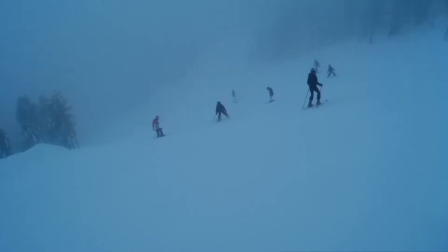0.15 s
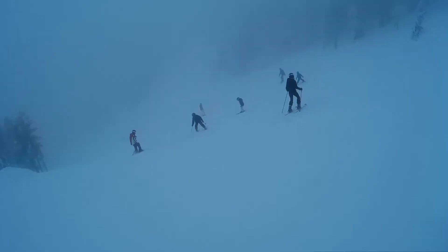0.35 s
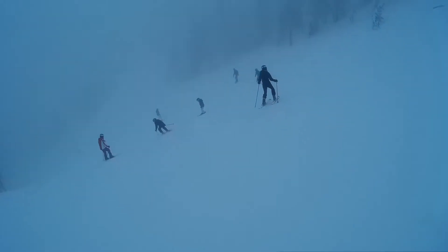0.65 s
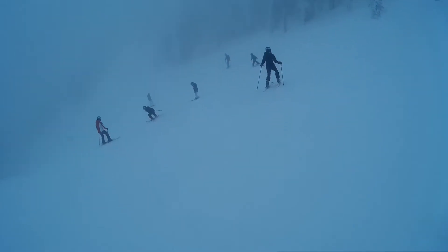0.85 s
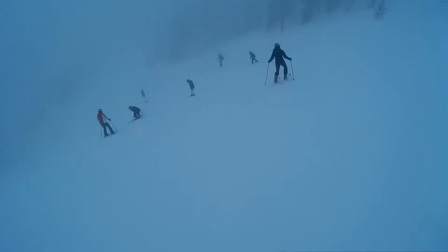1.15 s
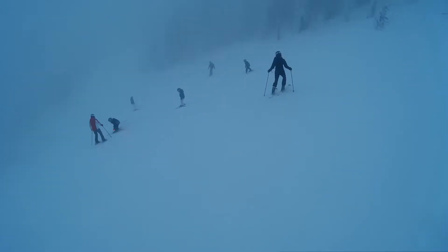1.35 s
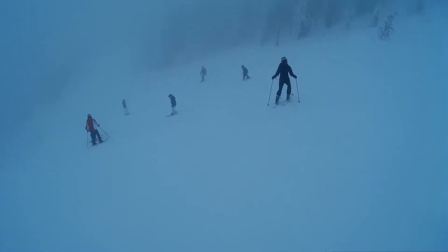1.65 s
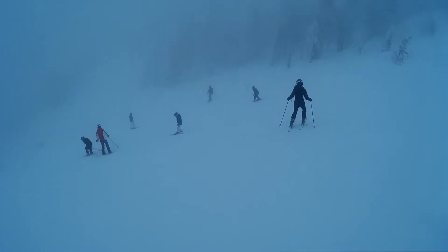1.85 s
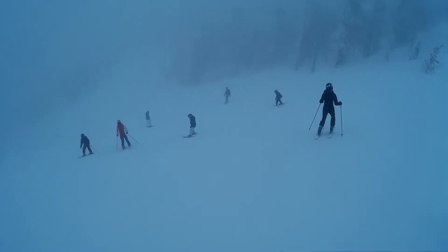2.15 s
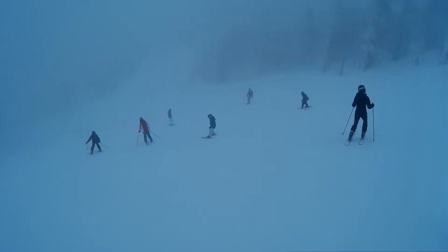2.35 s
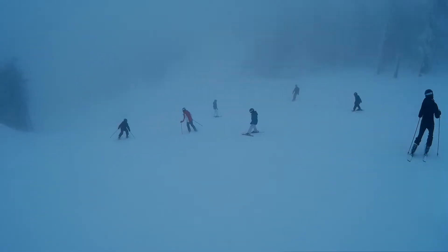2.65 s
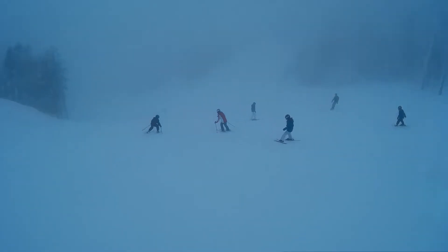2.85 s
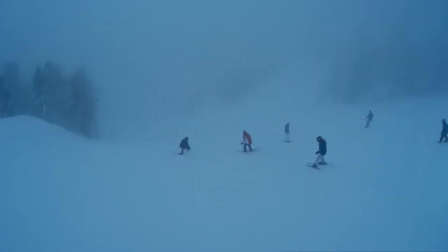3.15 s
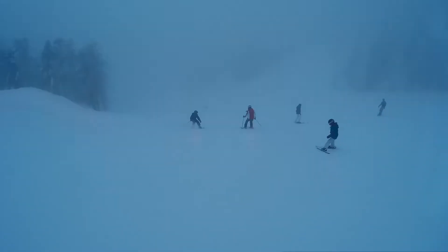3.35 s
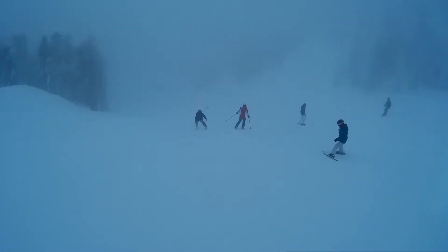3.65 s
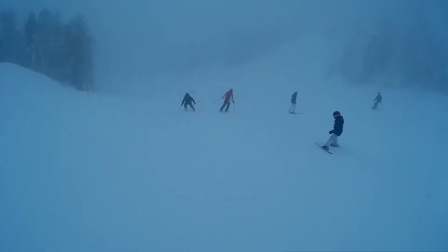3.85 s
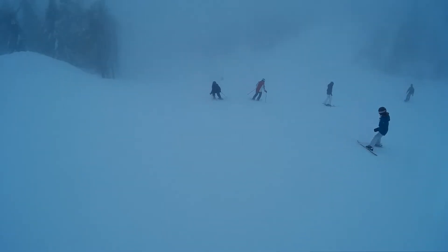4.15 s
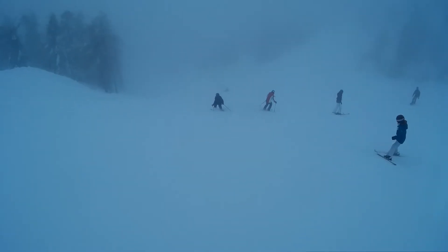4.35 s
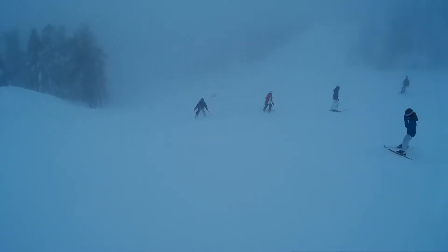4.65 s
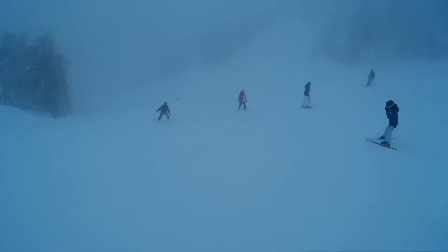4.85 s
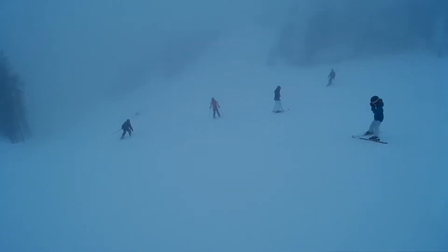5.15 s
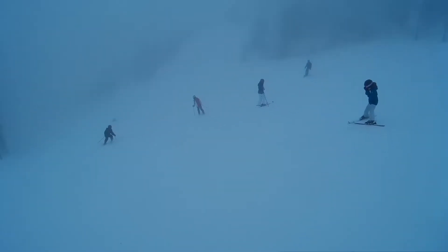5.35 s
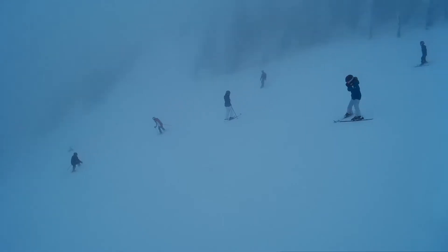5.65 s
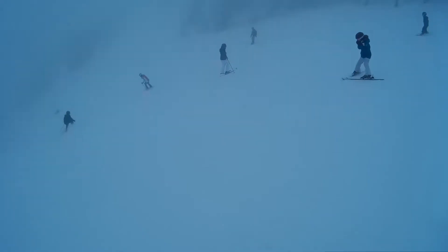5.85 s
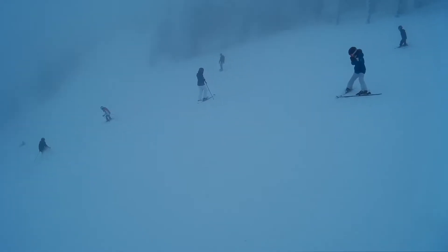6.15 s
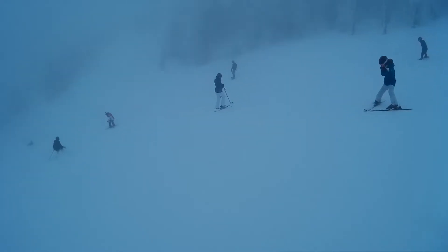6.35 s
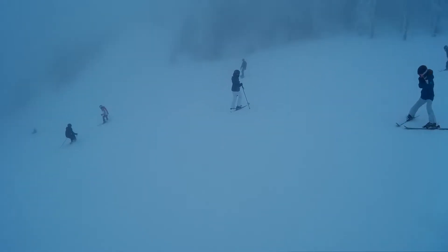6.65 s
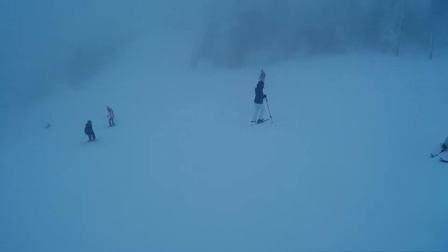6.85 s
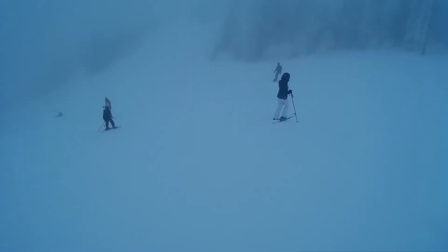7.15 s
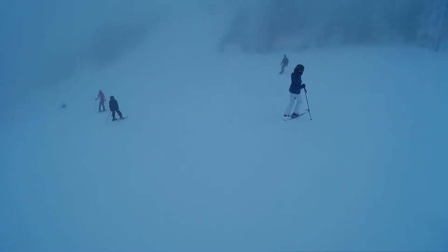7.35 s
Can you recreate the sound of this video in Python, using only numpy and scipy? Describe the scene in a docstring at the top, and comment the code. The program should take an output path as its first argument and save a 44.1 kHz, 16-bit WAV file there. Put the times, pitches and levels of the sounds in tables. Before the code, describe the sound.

Sharp knocks and dull handling thumps on a microphone, over quiet skis gliding and skidding on snow with low wind.

```python
"""Skis glide and scrape over packed snow, heard from a camera carried by the skier.
Crushed snow hisses through the resonances of the camera case, swelling each time the edges skid.
Ruts shake the skis into a rumble. The case is knocked and bumped in the hand; clothing ticks
against it and once brushes hard across it. Underneath, air buffets the microphone port."""
import sys
import numpy as np
from scipy import signal
from scipy.fft import rfft, irfft
from scipy.io import wavfile
from scipy.ndimage import uniform_filter1d

SR = 44100
rng = np.random.default_rng(int(sys.argv[2]) if len(sys.argv) > 2 else 0)


def dump_mix(stems):
    """Bounce the given channels to the path in sys.argv[1] as a 16-bit WAV at rate SR."""
    frames = np.atleast_2d(stems).T  # one column per channel
    limited = np.clip(frames, -1, 1)  # hard clip at full scale
    pcm = np.round(limited * 32767).astype(np.int16)
    wavfile.write(sys.argv[1], SR, pcm)


N = 330750

# The edges skid. Each row: start in seconds, hold in seconds, level at the end of the hold in dB,
# build-up over the hold in dB, release in seconds, treble bite in dB relative to the scrape.
EDGE_SKIDS = [(0.155, 0.38, -52.8, 11, 0.24, -15.5), (1.457, 0.18, -65, 2, 0.14, -11.5),
              (1.69, 0.21, -64, -1, 0.031, -27), (2.265, 0.2, -53.5, 10, 0.072, -14.5),
              (2.488, 0.5, -58.5, -2.5, 0.084, -13.5), (3.016, 0.38, -58.5, -1, 0.1, -10.5),
              (3.67, 0.17, -60, 2.5, 0.064, -12), (4.296, 0.41, -55.5, 2.5, 0.15, -12.5),
              (4.791, 0.47, -53.5, 3, 0.19, -13.5), (5.25, 0.18, -51.5, 1.5, 0.33, -12),
              (5.524, 0.41, -46.5, 5.5, 0.16, -13), (6.155, 0.15, -60, -6.5, 0.36, -13),
              (6.418, 0.084, -58.5, -1, 0.056, -13), (6.95, 0.493, -59, 5, 0.1, -14.5)]
def scrape():
    """Envelopes of the scrape and its treble: each skid sets in, holds and dies away over the glide."""
    attack_s = 0.061
    glide_db, glide_bite_db, glide_db_per_s = -69.5, -14, 0.8  # flat skis, slowly gathering speed
    t = np.arange(N) / SR
    body_power = undb(glide_db + glide_db_per_s * t) ** 2
    edge_power = body_power * undb(glide_bite_db) ** 2
    for start, hold, db, build_db, release, bite_db in EDGE_SKIDS:
        age = t - start
        held = undb(db + build_db * (np.clip(age / hold, 0, 1) - 1))
        skid = np.clip(age / attack_s, 0, 1) * held * np.exp(-np.maximum(age - hold, 0) / release)
        body_power += skid ** 2
        edge_power += (skid * undb(bite_db)) ** 2
    return np.sqrt(body_power), np.sqrt(edge_power)


# Air and wall resonances of the case, mids and treble. Each row: centre in Hz, width in Hz, gain in dB.
CASE_MIDS = [(812, 63, -1.5), (1057, 128, 0), (1196, 110, -1), (1323, 75, 1.5), (1400, 180, -9),
             (1594, 153, -4.5), (1794, 146, -1)]
CASE_TREBLE = [(2180, 190, 0.5), (2560, 470, 0.5), (2980, 350, 4), (3460, 91, -7), (3977, 370, 2.5),
               (4610, 260, -1.5), (5370, 460, 2), (6800, 700, -8), (8240, 420, -6)]
# The broad tone of crushed snow. Each row: frequency in Hz, gain in dB.
SNOW_EQ = [(150, -16.5), (400, -4), (700, 3), (1200, 1.5), (1900, -2), (2300, -11), (4000, -14),
           (7000, -24.5), (14000, -52)]
def skis(effort, bite):
    """Snow crystals break under the bases; the edges chatter and add treble as they bite."""
    crunch = grains(rate=7000, spread_db=4.5) * undb(1.02 * walk(35))
    snow = unit(colour(grains(rate=9000, spread_db=2.5), SNOW_EQ))
    body = unit(resonate(crunch, CASE_MIDS)) * undb(-0.5) + snow * undb(-7.5)
    edge = unit(resonate(crunch, CASE_TREBLE))
    return (body * effort + edge * bite) * undb(0.25 * walk(20))


# Soft snow flexes the skis. Each row: time in seconds, drone in dB relative to the judder.
SKI_FLEX = [(0, -12), (1.5, -2.5), (2.1, -11.5), (3.0, -3), (4.2, -2), (4.8, -4), (5.5, -3), (6.2, -7),
            (7.4, -10.5)]
# The low body of the juddering skis. Each row: frequency in Hz, gain in dB.
RUMBLE_EQ = [(60, -6.5), (120, -7), (165, -8.5), (220, -1.5), (290, 2), (340, -3.5), (420, -12.5),
             (700, -21), (1500, -58)]
# Rutted patches. Each row: middle in seconds, half length in seconds, level in dB.
RUTS = [(1.43, 0.1, -61), (1.866, 0.074, -61), (4.15, 0.15, -56), (4.38, 0.089, -58), (7.228, 0.09, -58)]
def rumble(effort):
    """Ruts and lumps shake the skis; in softer snow they flex and drone lower."""
    lumps = grains(rate=1500, spread_db=4.5) * undb(0.98 * walk(17))
    judder = unit(colour(lumps, RUMBLE_EQ))
    drone = unit(resonate(grains(rate=1500, spread_db=1.0), [(161, 54, 0)]))
    flex = undb(curve(SKI_FLEX))
    shake = (judder + flex * drone) / np.sqrt(1 + flex ** 2)  # equal-power blend
    return shake * follow(effort, RUTS, base_db=-56, db_per_db=0.71)


# The ring of the struck case. Each row: pitch in Hz, time to fall 60 dB in seconds, level in dB.
SHELL_MODES = [(248, 0.017, -4), (410, 0.036, -8), (556, 0.018, -3), (1037, 0.035, -8), (1343, 0.031, -8.5),
               (1650, 0.017, -11), (1945, 0.021, -9.5), (2540, 0.013, -11), (3830, 0.018, -15.5),
               (4900, 0.01, -14.5)]
# Hard knocks. Each row: start in seconds, thud level in dB, thud pitch in Hz, swell in cycles,
# crack level in dB, crack cut-off in Hz, rebound in dB relative to the crack.
HARD_KNOCKS = [(0.4200, -23.5, 316, 0.64, -31.5, 5660, -0.5), (0.564, -13, 186, 0.37, -39.5, 4660, 7.5),
               (1.027, -21, 271, 0.67, -29, 6500, -7), (1.149, -25, 154, 0.36, -42.5, 1000, 2),
               (1.1931, -35.5, 436, 0.55, -30, 1410, 6), (1.247, -47, 260, 0.96, -47, 2200, 6),
               (2.8678, -36.5, 128, .55, -28, 4320, -3), (3.268, -53, 610, 0.39, -37.5, 1500, -12),
               (3.379, -33.5, 72.5, 0.36, -45, 1480, 3)]
# Soft bumps of the hand. Each row: start in seconds, thud level in dB, thud pitch in Hz.
HAND_BUMPS = [(0.344, -35.5, 92), (0.501, -29, 139), (0.509, -31.5, 52), (1.083, -35.5, 57.3),
              (1.108, -32, 55), (3.0972, -28.5, 125), (3.162, -29, 127), (3.25, -29, 88.5),
              (3.353, -32, 165), (3.67, -34.5, 240)]
def knocks():
    """Each blow rocks the case in a damped thud; the contact cracks, rings the shell and bounces."""
    out, t = np.zeros(N), np.arange(SR // 6) / SR
    ring = sum((-1) ** k * undb(db) * np.sin(2 * np.pi * hz * t) * np.exp(-np.log(1000) * t / t60)
               for k, (hz, t60, db) in enumerate(SHELL_MODES))
    # bumps play as knocks with a faint, dull crack
    soft = [(start, db, hz, 0.43, db - 22, 2400, -9) for start, db, hz in HAND_BUMPS]
    for start, thud_db, hz, cycles, crack_db, cutoff_hz, rebound_db in HARD_KNOCKS + soft:
        # one strong swing, then a weaker wobble as the hand damps it
        age = t * hz / cycles
        swing = (age * np.exp(1 - age)) ** 2
        wobble = undb(-17.5) * (age / 3 * np.exp(1 - age / 3)) ** 2
        thud = -np.sin(2 * np.pi * hz * t) * np.maximum(swing, wobble)
        # the first touch rings the shell; the rebound a moment later is a short gritty snap
        grit = rng.standard_normal((2, len(t))) * np.exp(-t / 0.00043)
        lowpass = signal.butter(3, cutoff_hz, fs=SR, output="sos")
        touch = signal.sosfilt(lowpass, ring + undb(1.5) * grit[0])
        snap = signal.sosfilt(lowpass, undb(-2.5) * ring * np.exp(-t / 0.00069) + undb(3.5) * grit[1])
        add(out, start, undb(thud_db) * thud + undb(crack_db) * touch)
        add(out, start + 0.00265, undb(crack_db + rebound_db) * snap)
    return out


# Light touches of clothing. Each row: start in seconds, relative level in dB.
CLOTH_TICKS = [(0.626, -42.5), (0.729, -51), (0.742, -48), (0.804, -53), (0.816, -48), (2.058, -50.5),
               (2.44, -50), (2.532, -47.5), (2.6297, -48), (2.6577, -50), (6.475, -47.5), (7.39, -55)]
# Their thin, bright tone. Each row: frequency in Hz, gain in dB.
TICK_EQ = [(1000, -31), (3000, 13.5), (4300, -4), (6000, 5.5), (9000, 1.5), (11000, 6), (12500, -11),
           (15000, -6)]
def clothing_ticks():
    """Stiff fabric catches on the case in tiny bursts of noise."""
    envelope, t = np.zeros(N), np.arange(SR // 30) / SR
    for start, db in CLOTH_TICKS:
        add(envelope, start, undb(db) * (t / 0.0013) * np.exp(1 - t / 0.0011))
    return envelope * unit(colour(rng.standard_normal(N), TICK_EQ)) * undb(-7)


# Strokes of fabric. Each row: peak in seconds, relative level in dB, swell in seconds, fade in seconds.
CLOTH_STROKES = [(5.786, -52.5, 0.022, 0.0048), (5.9, -59.5, 0.26, 0.055), (5.924, -51, 0.027, 0.013)]
# The fabric lets go. Each row: start in seconds, relative level in dB, decay in seconds.
CLOTH_SLIPS = [(5.842, -47, 0.001), (5.874, -41, .002), (5.8817, -44, 0.0018), (5.909, -38.5, 0.0028),
               (5.914, -42, .001), (5.919, -30.5, 0.0035), (5.9252, -35.5, 0.0025)]
# The tone of the rub. Each row: frequency in Hz, gain in dB.
CLOTH_EQ = [(200, -0.5), (900, 1.5), (1800, 1), (2400, -8.5), (3100, -10), (3600, -12.5), (5400, -3),
            (6700, -10), (7600, -14), (11000, -5.5), (12500, -16), (14500, -21)]
# The ring of the rubbed case wall. Each row: centre in Hz, width in Hz, gain in dB.
WALL_MODES = [(1750, 140, 11.5), (3000, 220, 12.5), (3840, 140, -1), (5400, 160, 0), (6800, 200, 3)]
def clothing_brush():
    """Fabric drags across the case and rings its wall: one swelling brush that ends in sharp slips."""
    t = np.arange(N) / SR
    pressure = sum(undb(db) * np.exp(np.minimum((t - peak) / swell, (peak - t) / fade))
                   for peak, db, swell, fade in CLOTH_STROKES)
    friction = pressure * undb(2.0 * walk(300))
    for start, db, decay in CLOTH_SLIPS:
        add(friction, start, undb(db) * np.exp(-t[:SR // 30] / decay))
    rub = friction * rng.standard_normal(N)
    rasp = colour(rub, CLOTH_EQ) * undb(3) + resonate(rub, WALL_MODES)
    # single threads catch and crackle at the very top
    thread_eq = [(5000, -20.5), (8000, -1), (11000, 0), (14000, -16)]
    threads = friction * unit(colour(grains(rate=1400, spread_db=14), thread_eq))
    return rasp + threads * undb(-9)


# Gusts on the port. Each row: middle in seconds, half length in seconds, level in dB.
GUSTS = [(0.56, 0.24, -46.5), (1.4, 0.49, -62), (2.872, 0.025, -49), (3.285, 0.065, -49),
         (4.53, 0.044, -52), (5.397, 0.06, -50), (5.69, 0.063, -44.5), (5.965, 0.066, -43.5),
         (6.363, 0.13, -53.5), (7.347, 0.038, -54)]
# The deep tone of the buffeting. Each row: frequency in Hz, gain in dB.
WIND_EQ = [(10, -4.5), (26, 1.5), (60, 1), (100, -9), (160, -16.5), (400, -54.5)]
def wind(effort):
    """Eddies press on the microphone port."""
    eddies = rng.standard_normal(N) * undb(walk(26))
    return unit(colour(eddies, WIND_EQ)) * follow(effort, GUSTS, base_db=-58, db_per_db=0.38)


# The tone of the noise floor. Each row: frequency in Hz, gain in dB.
HISS_EQ = [(100, 14), (1000, 11.5), (2500, 2), (5000, -1.5), (8000, -1), (11000, 0), (13600, -2),
           (14300, -14), (15000, -20)]
def microphone_hiss():
    """The microphone's own faint, steady noise."""
    return unit(colour(rng.standard_normal(N), HISS_EQ)) * undb(-68)


def follow(effort, swells, base_db, db_per_db):
    """An envelope that rides the scrape, at base_db in a typical skid, with its own swells on top."""
    typical_skid_db = -56.5
    riding = undb(base_db) * (effort / undb(typical_skid_db)) ** db_per_db
    swell_power = sum((undb(db) * bell(middle, half)) ** 2 for middle, half, db in swells)
    return np.sqrt(riding ** 2 + swell_power)


def grains(rate, spread_db):
    """Tiny fractures and slips of unequal size at random moments, about `rate` a second."""
    hit = rng.random(N) < rate / SR
    return unit(hit * rng.choice([-1, 1], N) * undb(spread_db * np.clip(rng.standard_normal(N), -2, 2)))


def walk(rate):
    """Smooth random wander at rms 1, with `rate` steps a second."""
    k = max(int(SR / rate), 2)
    steps = np.repeat(rng.standard_normal(N // k + 1), k)
    return unit(uniform_filter1d(uniform_filter1d(steps, k), k)[:N])


def colour(x, points):
    """Minimum-phase EQ through the given (Hz, dB) points."""
    hz, db = np.transpose(points)
    freq = np.maximum(np.fft.rfftfreq(N, 1 / SR), 1)
    gain = undb(np.interp(np.log(freq), np.log(hz), db))
    cepstrum = irfft(np.log(gain), N)
    cepstrum[1:N // 2] *= 2
    cepstrum[N // 2 + 1:] = 0
    return irfft(rfft(x) * np.exp(rfft(cepstrum)), N)


def resonate(x, modes):
    """Steep resonances side by side."""
    freq = np.fft.rfftfreq(N, 1 / SR)
    power = sum(undb(db) ** 2 / (1 + ((freq - hz) / width) ** 2 * 2) ** 2 for hz, width, db in modes)
    return irfft(rfft(x) * np.sqrt(power), N)


def bell(middle, half):
    """A smooth rise and fall, peaking at 1."""
    return np.exp(-((np.arange(N) / SR - middle) / half) ** 2)


def curve(points):
    """Join (seconds, value) points with straight lines."""
    times, values = np.transpose(points)
    return np.interp(np.arange(N) / SR, times, values)


def add(track, start, sound):
    """Mix a sound in at its start in seconds."""
    i = int(start * SR)
    track[i:i + len(sound)] += sound[:N - i]


def undb(db):
    """Decibels to gain."""
    return 10 ** (np.asarray(db) / 20)


def unit(x):
    """Scale to rms 1."""
    return x / np.sqrt(np.mean(x ** 2))


def scene():
    """The mono mix; the scrape drives the snow, the rumble and the wind."""
    effort, bite = scrape()
    hiss = microphone_hiss()
    skiing = skis(effort, bite) + rumble(effort) + wind(effort)
    handling = knocks() + clothing_ticks() + clothing_brush()
    return (skiing + handling + hiss)[None]


def record(dry):
    """The level dips briefly after one knock; the top is cut steeply."""
    dip_db, top_hz = -21, 14600
    dipped = dry * undb(dip_db * bell(middle=2.8955, half=0.0045))
    return signal.sosfilt(signal.ellip(8, 0.2, 70, top_hz, fs=SR, output="sos"), dipped)


dry = scene()
out = record(dry)
dump_mix(out)
```